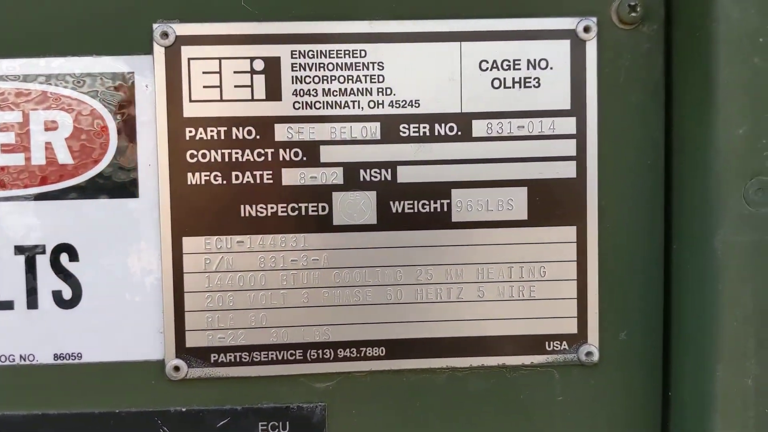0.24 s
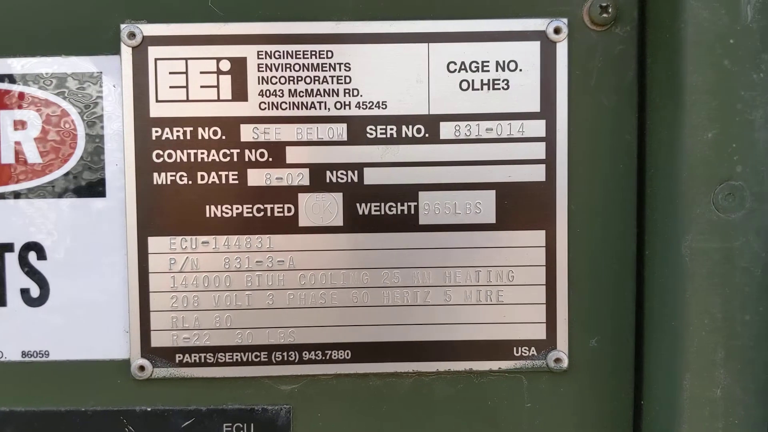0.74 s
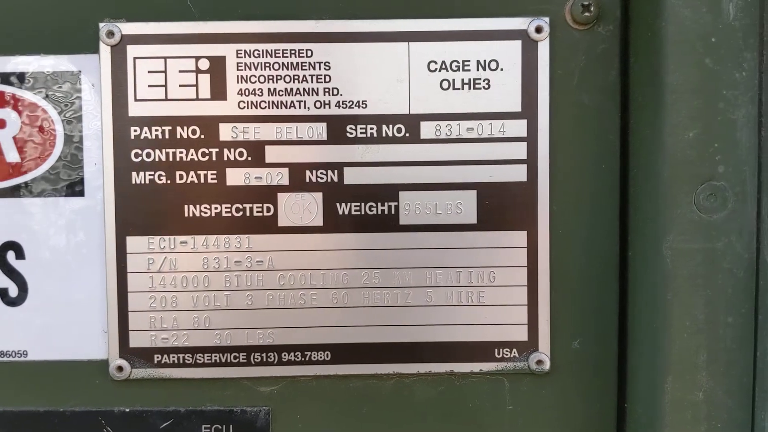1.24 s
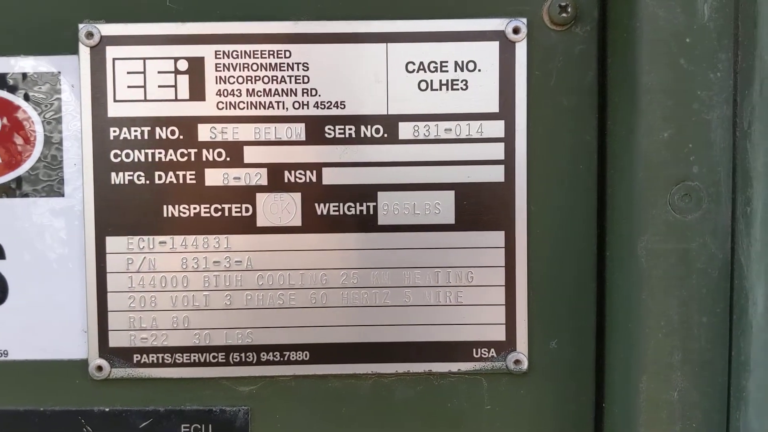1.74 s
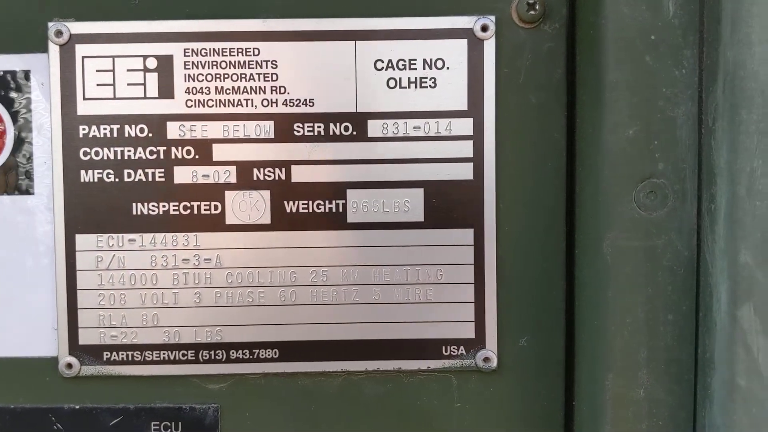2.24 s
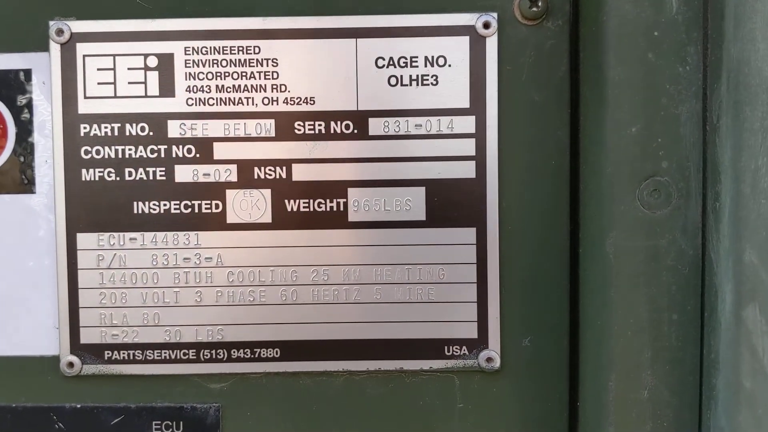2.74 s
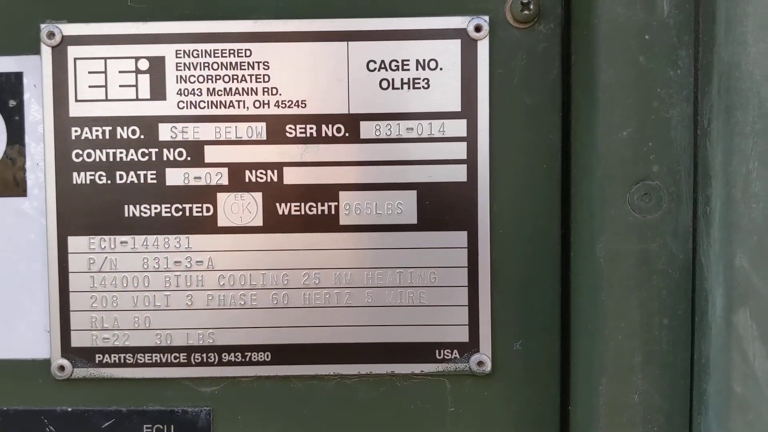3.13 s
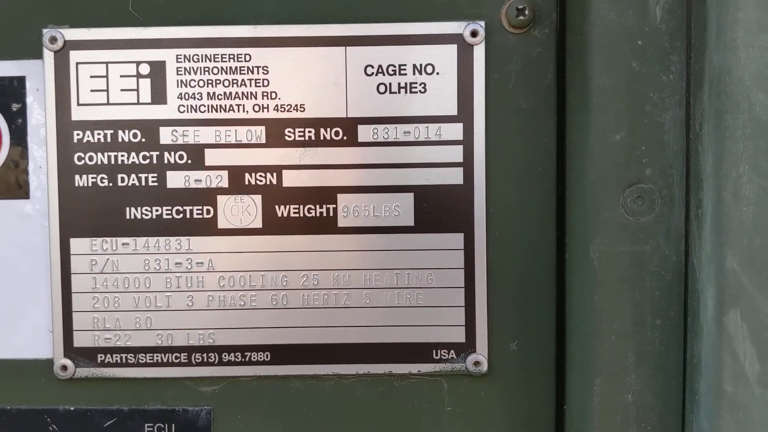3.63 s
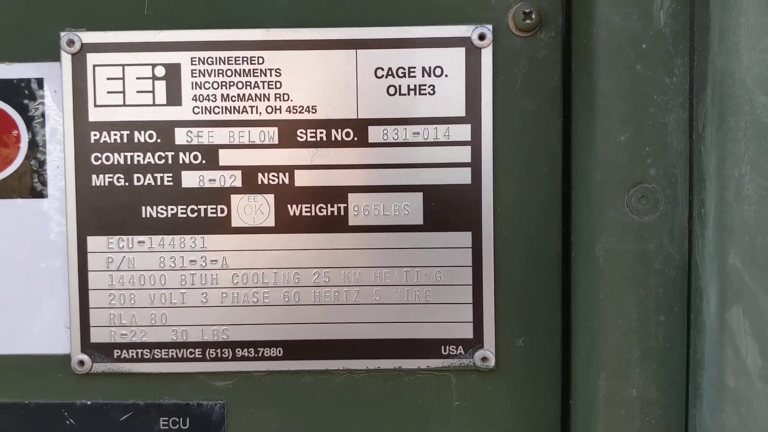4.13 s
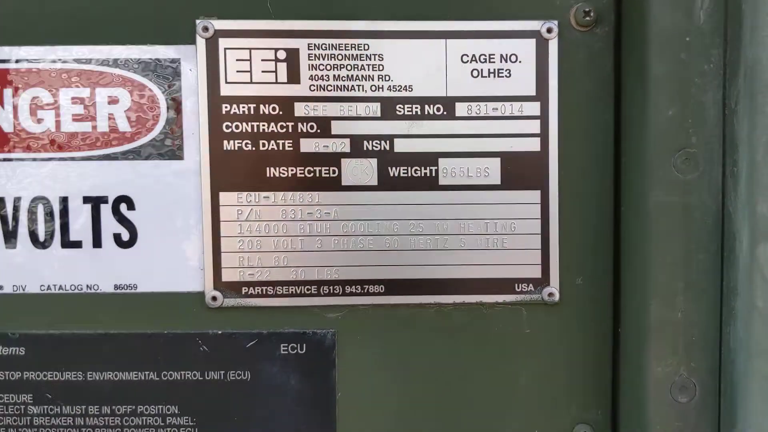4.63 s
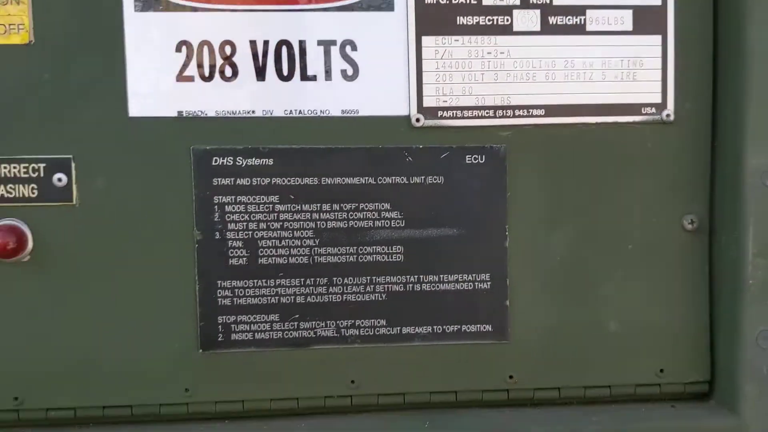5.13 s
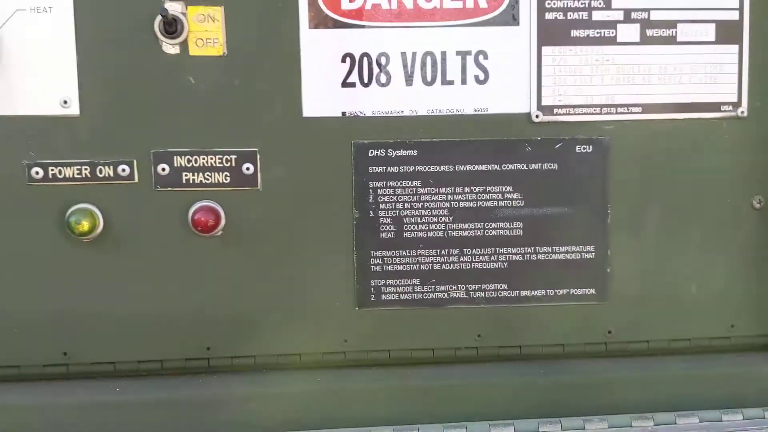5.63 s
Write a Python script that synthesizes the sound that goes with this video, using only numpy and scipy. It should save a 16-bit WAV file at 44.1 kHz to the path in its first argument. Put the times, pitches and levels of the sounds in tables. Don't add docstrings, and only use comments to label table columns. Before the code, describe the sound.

Constant engine hum and airy fan noise heard close to a metal cabinet, a piercing faint whine wavering on top, colour shifting near the end.

```python
import sys
import numpy as np
from scipy import signal
from scipy.io import wavfile
from scipy.ndimage import uniform_filter1d

SR = 44100
rng = np.random.default_rng(int(sys.argv[2]) if len(sys.argv) > 2 else 0)


def wav_out(sig):
    wavfile.write(sys.argv[1], SR, np.round(np.clip(np.atleast_2d(sig).T, -1, 1) * 32767).astype(np.int16))


def how_loud(loudness_db):
    steps = np.asarray(loudness_db, float) / 20
    return 10 ** steps


N = 258867
T = np.arange(N) / SR
FIRING_HZ = 59.869


def evened(x):
    return x / np.sqrt(np.mean(abs(x) ** 2) + 1e-20)


def read(points, hz):
    f, value = np.transpose(points)
    return np.interp(np.log(hz + 1), np.log(f + 1), value)


def wander(top_hz):
    z = np.fft.fft(rng.standard_normal(N) + 1j * rng.standard_normal(N))
    rolloff = 1 + (np.fft.fftfreq(N, 1 / SR) / top_hz) ** 4
    return evened(np.fft.ifft(z / rolloff))


# time_s, firing_rate_hz
ENGINE_SPEED = [(0, 59.79), (0.35, 59.79), (0.75, 59.855), (1.15, 59.89), (1.55, 59.916), (1.95, 59.95),
                (2.35, 59.84), (2.75, 59.907), (3.15, 59.873), (3.55, 59.907), (3.95, 59.841),
                (4.35, 59.762), (4.75, 59.835), (5.15, 59.818), (5.55, 59.87), (5.87, 59.87)]


def firing_phase():
    return np.cumsum(np.interp(T, *np.transpose(ENGINE_SPEED))) / SR + .011


TURNS = firing_phase()

# time_s, drop_0_to_1
MICROPHONE_DROP = [
    (0, 0),
    (4.5, 0.01),
    (4.9, 0.43),
    (5.2, 1),
    (5.87, 0.92),
]


def drop_at(time_s):
    return np.interp(time_s, *np.transpose(MICROPHONE_DROP))


# frequency_hz, left_over_right_db
PORT_LEAN = [(60, 1), (110, 2.5), (200, 3.5), (380, 5.5), (700, 5), (1290, 2.5), (2380, 0), (4400, 6.5),
             (8120, 1.5), (15000, 2.5)]
# frequency_hz, right_lead_rad
PORT_LEAD = [(20, -1), (60, 0.34), (180, 0.5), (430, 1.35), (800, 0.68), (1120, -1.5), (2300, 1.5),
             (4000, -6), (15000, -4)]


def ports(tone, hz, lead):
    lean = read(PORT_LEAN, hz) / 2
    left = how_loud(lean) * tone * np.exp(-.5j * lead)
    right = how_loud(-lean) * tone * np.exp(.5j * lead)
    return np.sqrt(2) * np.real([left, right])


# centre_hz, width_hz, high_db, halfway_db, lowered_db
CABINET_MODES = [(428, 68, 4, -4, 9), (697, 27, 7, 13, 6), (784, 76, 6.5, 7, 0), (865, 55, 9.5, 3, -7),
                 (940, 210, -2.5, -10, 5), (1125, 97, 7, 7, 2), (1480, 330, 1.5, 5, 0), (2090, 32, 4, 5, 7),
                 (2454, 380, 1.5, 3, -0.5), (3150, 350, 5, -1, 2), (4004, 95, 5, 11, -9),
                 (4077, 310, 7.5, 3.5, 3.5), (5490, 1620, 4, 3, 4.5), (8020, 720, 13.5, 15, 15)]
# frequency_hz, likeness_0_to_1
PORT_COHERENCE = [(60, 1), (130, 0.82), (290, 0.71), (640, 0.74), (1200, 0.57), (2000, 0.087), (4000, 0.16),
                  (15000, 0.098)]


def noise(points, level_db, patchy_db, size=2048):
    frames, hz = 4 * N // size + 5, np.fft.rfftfreq(size, 1 / SR)
    a, b, c, d, patches = rng.standard_normal((frames, len(hz), 5)).T
    drop = drop_at(np.arange(frames) * size / 4 / SR)

    power = np.ones((len(hz), frames))
    for centre_hz, width_hz, *gain_db in CABINET_MODES:
        detuning = 2 * (hz[:, None] - centre_hz) / width_hz
        power += how_loud(2 * np.interp(drop, [0, .5, 1], gain_db)) / (1 + detuning ** 2) ** 2
    patches = evened(uniform_filter1d(uniform_filter1d(patches, 14, 0), 10, 1))

    same = read(PORT_COHERENCE, hz)[:, None]
    lead = np.exp(1j * read(PORT_LEAD, hz))[:, None]
    lean = how_loud(read(PORT_LEAN, hz) / 2)[:, None]
    left, stranger = a + 1j * b, c + 1j * d
    right = same * left * lead + np.sqrt(1 - same ** 2) * stranger
    z = np.array([left * lean, right / lean])
    z *= how_loud(read(points, hz)[:, None] + patchy_db * patches) * np.sqrt(power)
    sound = signal.istft(z, nperseg=size, noverlap=3 * size // 4)[1][:, :N]
    return how_loud(level_db) * evened(sound)


SHAFT_ORDERS = [1, 2, 3, 4, 5, 6, 7, 8, 10, 12, 13, 14, 16, 24, 28, 36]
# level_db, unsteadiness_0_to_1
EXHAUST_ORDERS = [(-46, 0.6), (-21.5, 0), (-46, 0.99), (-25.5, 0), (-41, 0.64), (-33.5, 0.33),
                  (-42.5, 0.82), (-47, 0.48), (-41.5, 0.19), (-43, 0), (-45.5, 0.62), (-47, 0.89),
                  (-45, 0.1), (-49.5, 0.4), (-46, 0.2), (-48.5, 0.46)]


def exhaust():
    out = np.zeros((2, N))
    for order, (db, unsteady) in zip(SHAFT_ORDERS, EXHAUST_ORDERS):
        hz = order * FIRING_HZ / 2
        lag = .6 * abs(order / 2 - 1) ** 2.8
        swing = np.sqrt(1 - unsteady ** 2) + unsteady * wander(top_hz=1.95)
        tone = how_loud(db) * swing * np.exp(1j * (np.pi * order * TURNS - lag))
        out += ports(tone, hz, read(PORT_LEAD, hz))
    return out


CYLINDER_STRENGTH = [-0.23, 0.63, -0.68, 0.57]


def firings(late, sharp, spread_db):
    turns = TURNS - late + 4.46
    count = turns.astype(int)
    chance_db = spread_db * rng.standard_normal(count[-1] + 1)
    size_db = np.take(CYLINDER_STRENGTH, count, mode="wrap") + chance_db[count]
    hump = np.cos(np.pi * (turns - count - .5)) ** (2 * sharp)
    return evened(how_loud(size_db) * hump)


# frequency_hz, density_db_per_hz
KNOCK_SPECTRUM = [(200, 2.5), (500, -19.5), (800, -5.5), (1300, -14), (2000, -18.5), (4000, -27.5),
                  (7000, -47), (11000, -20.5), (13000, -36), (15500, -22.5)]


def knock():
    bursts = firings(late=0.27, sharp=1.47, spread_db=1.0)
    return noise(KNOCK_SPECTRUM, level_db=-32, patchy_db=0.55) * bursts


# frequency_hz, width_hz, level_db
PIPE_MODES = [(9450, 200, -10), (9790, 130, 1), (9950, 260, -4), (10170, 300, -11), (10320, 100, -10)]
# time_s, level_db
RING_LEVEL = [(0.0, -37), (0.44, -39.5), (0.46, -34), (0.87, -35), (1.03, -38), (2.76, -40), (2.99, -35.5),
              (3.25, -44), (3.45, -38), (4.18, -46.5), (4.4, -39), (4.64, -42.5), (4.76, -36), (4.82, -38),
              (4.97, -38.5), (4.98, -44.5), (5.8, -37), (5.87, -40)]


def injector():
    t = np.arange(1024) / SR
    puff = firings(late=.36, sharp=3, spread_db=1.5)
    out = np.zeros((2, N))
    for hz, width, db in PIPE_MODES:
        decay = t * np.exp(-np.pi * width * t)
        ring = how_loud(db) * width ** 2 * decay * np.sin(2 * np.pi * hz * t)
        air = 0.28 * rng.standard_normal(N) + rng.standard_normal((2, N))
        air += .11 * np.cos(2 * np.pi * hz * T + 3 * wander(top_hz=45).real)
        out += signal.oaconvolve(air * puff, ring[None], axes=1)[:, :N]
    port_db = np.array([[5.5], [1.5]])
    return evened(out) * how_loud(np.interp(T, *np.transpose(RING_LEVEL)) + port_db)


# middle_s, length_s, peak_level_db, pitch_hz, left_right_db
WHISTLE_SWELLS = [(.07, .2, -34, 8176, 8), (.25, .2, -31, 8180, 2), (.40, .12, -36, 8225, 4),
                  (.56, .3, -33, 8190, -1), (.85, .3, -35, 8190, 0), (1.2, .4, -36, 8185, -2),
                  (1.59, .32, -29.5, 8185, 3), (1.80, .1, -30, 8196, 1.5), (2.0, .36, -24.5, 8206, 8),
                  (2.3, .25, -35, 8182, 7), (2.58, .3, -34, 8195, 0), (2.9, .42, -32.5, 8197, 0),
                  (3.33, .2, -36, 8193, 10), (3.47, .1, -34, 8235, 7), (3.77, .4, -28.5, 8190, 9),
                  (4.02, .3, -32, 8180, 10), (4.22, .22, -30, 8157, 5), (4.42, .17, -31, 8215, 10),
                  (4.6, .17, -31, 8188, 0), (4.745, .12, -29, 8236, 8), (4.92, .2, -31, 8200, 0),
                  (5.11, .2, -24.5, 8174, -1), (5.52, .3, -33, 8180, 9), (5.77, .3, -31, 8225, 5)]


def swells():
    lull, lull_hz, lull_pan_db = how_loud(-43), 8178, 2
    sag_hz_per_s, pan_reach = 60, 1.5
    middle, length, db, hz, pan_db = np.transpose(WHISTLE_SWELLS)[:, :, None]
    t = T[::64]
    arch = np.cos(np.pi * np.clip((t - middle) / length, -.5, .5)).clip(0)
    hump = how_loud(db - 1.5) * arch ** 1.1
    hump_sum = hump.sum(axis=0)
    total = lull + hump_sum

    swell_hz = hz - sag_hz_per_s * (t - middle)
    pitch = (lull * lull_hz + (hump * swell_hz).sum(axis=0)) / total
    swell_pan_db = lull_pan_db + pan_reach * (pan_db - lull_pan_db)
    pan = (lull * lull_pan_db + (hump * swell_pan_db).sum(axis=0)) / total
    level = np.hypot(lull, hump_sum)
    return (np.interp(T, t, curve) for curve in (pitch, level, pan))


# offset_hz, level_db
WHISTLE_SIDEBANDS = [(-590, -13), (-300, -29), (-155, -13.5), (-49.5, -12), (181, -15)]


def whistle():
    hz, level, pan_db = swells()
    hz = hz + 5 * wander(top_hz=13).real
    pan_db = pan_db + 3 * wander(top_hz=4).real
    tone = np.exp(2j * np.pi * np.cumsum(hz) / SR)
    centre = level * (1 + 0.31 * wander(top_hz=24.6)) * tone
    lean = (how_loud(pan_db) - 1) / (how_loud(pan_db) + 1)
    side = lean * centre + 1j * how_loud(-33) * wander(top_hz=21).real * tone
    out = np.array([centre + side, centre - side])
    for offset_hz, db in WHISTLE_SIDEBANDS:
        strength = how_loud(db) * np.sqrt(level * how_loud(-37))
        band = strength * tone * np.exp(2j * np.pi * offset_hz * T)
        out += [band * wander(top_hz=21.1), band * wander(top_hz=1.5)]
    return np.sqrt(2) * out.real


BUZZ_LINES = [-68, -62, -62, -65, -63, -67, -65, -59.5, -55.5, -55, -59, -58.5, -68]


def buzz():
    out = np.zeros((2, N))
    for order, db in enumerate(BUZZ_LINES, 37):
        swing = 1 + 0.5 * wander(top_hz=5)
        tone = how_loud(db + 6.5) * swing * np.exp(4j * np.pi * order * (TURNS - .21))
        lead = 1.8 + 0.7 * wander(top_hz=3).real
        out += ports(tone, order * 2 * FIRING_HZ, lead)
    return out * how_loud(-4.0 * drop_at(T))


# frequency_hz, waver_hz, high_level_db, lowered_level_db
FAN_HUMS = [(252.5, 4, -42.5, -51), (401.7, 19, -54, -35), (431.4, 5, -45, -49), (644.4, 5.8, -50, -58),
            (764.4, 7.9, -41.5, -63), (824.4, 8.6, -43.5, -49), (942, 28, -59, -43), (4080, 33, -49, -68)]


def fans():
    drop = drop_at(T)
    out = np.zeros((2, N))
    for hz, waver_hz, high_db, low_db in FAN_HUMS:
        level = how_loud(high_db + drop * (low_db - high_db))
        waver = 0.56 + 0.76 * wander(waver_hz)
        tone = level * waver * np.exp(2j * np.pi * hz * T)
        out += ports(tone, hz, read(PORT_LEAD, hz))
    return out


# frequency_hz, density_db_per_hz
ROAR_SPECTRUM = [(15, -41), (40, -12), (90, -2.5), (170, -2.5), (260, -10.5), (560, -11.5), (1250, -21),
                 (1900, -20), (3200, -20), (4600, -26.5), (6800, -29), (8900, -26.5), (13000, -29.5),
                 (15500, -30.5)]


def roar():
    return noise(ROAR_SPECTRUM, level_db=-25.5, patchy_db=0.7)


def scene():
    engine = exhaust() + knock() + injector() + whistle()
    return engine + buzz() + fans() + roar()


def top_cut(x):
    return signal.sosfilt(signal.butter(12, 17040, fs=SR, output="sos"), x)


# frequency_hz, bar_over_usual_level_db
LINE_BAR = [(3000, -13), (6500, -9), (7500, -15), (8500, -19), (8900, -6), (9500, -16), (10600, -5),
            (11400, -5), (12300, 4), (13300, 3.5), (14400, 2), (15300, -2)]


def record(dry):
    window = signal.windows.kaiser_bessel_derived(2048, 4 * np.pi)
    hz, t, z = signal.stft([dry[0] + dry[1], dry[0] - dry[1]], SR, window, nperseg=2048)

    sinking = evened(uniform_filter1d(rng.standard_normal(len(t)), size=3))
    bands = np.repeat(rng.standard_normal((len(t), 33)).T, 32, axis=0)[:len(hz)]
    shift_db = 2.5 * evened(uniform_filter1d(bands, size=2))
    shift_db = shift_db + 1.2 * rng.standard_normal(len(t)) + .9 * np.clip(sinking, -2, 2)

    mean_power = (abs(z) ** 2).mean(2, keepdims=True)
    usual = np.sqrt(uniform_filter1d(mean_power, size=24, axis=1))
    strong = abs(z) > usual * how_loud(read(LINE_BAR, hz)[:, None] + shift_db)
    kept = strong | (hz < LINE_BAR[0][0])[:, None]
    below_edge = (hz < 15750)[:, None]
    mid, side = signal.istft(z * kept * below_edge, SR, window, nperseg=2048)[1][:, :N]
    return top_cut(np.array([mid + side, mid - side]) / 2)


dry = scene()
out = record(dry)
wav_out(out)
```